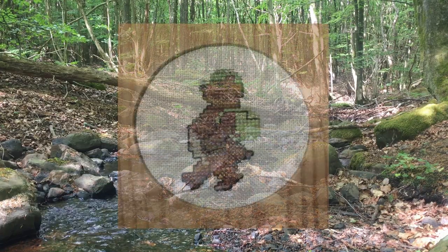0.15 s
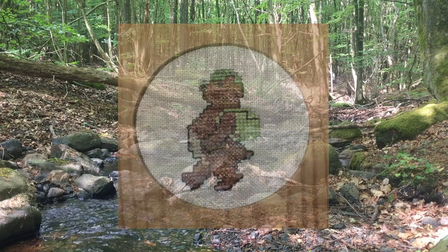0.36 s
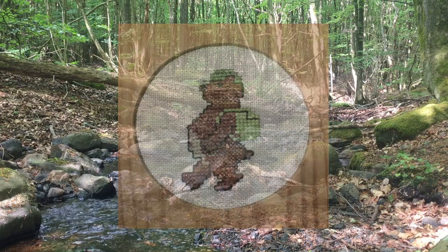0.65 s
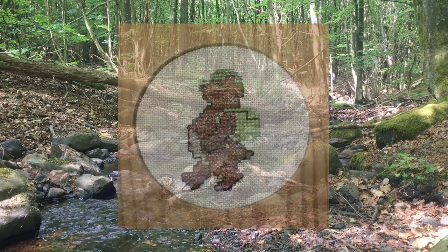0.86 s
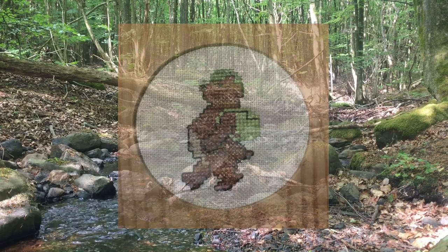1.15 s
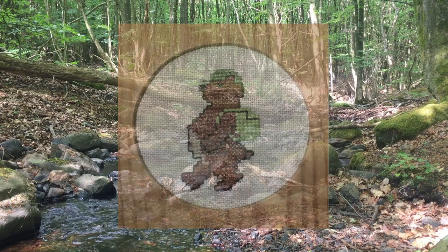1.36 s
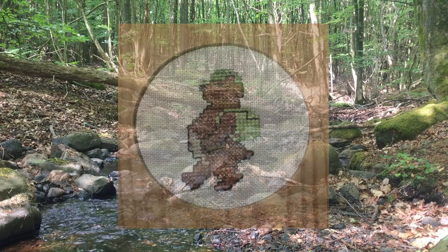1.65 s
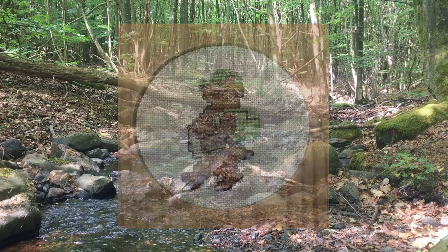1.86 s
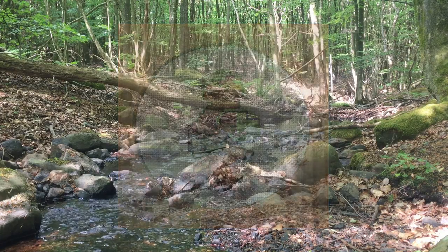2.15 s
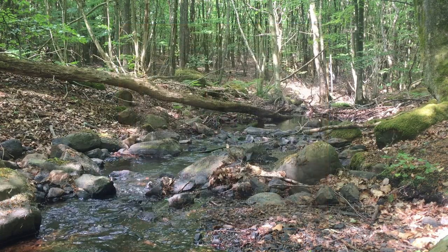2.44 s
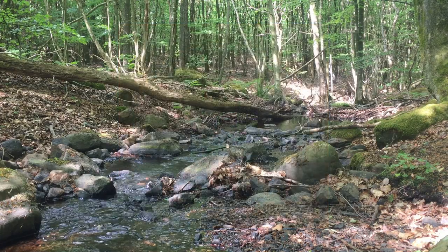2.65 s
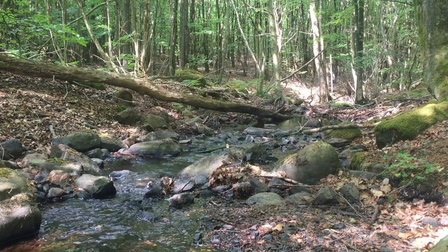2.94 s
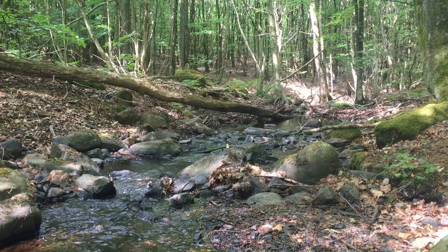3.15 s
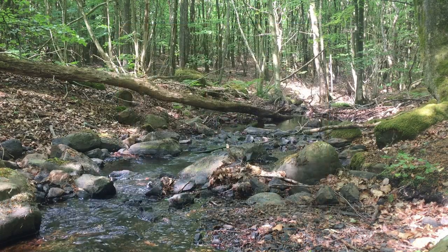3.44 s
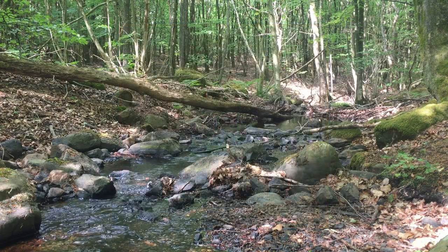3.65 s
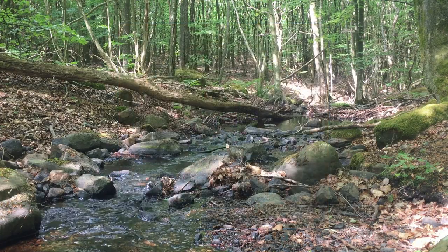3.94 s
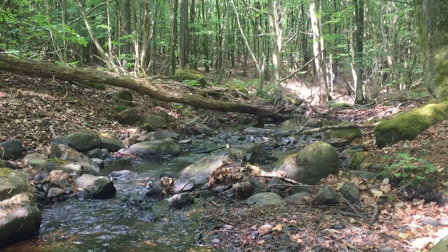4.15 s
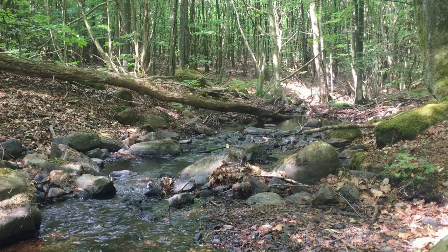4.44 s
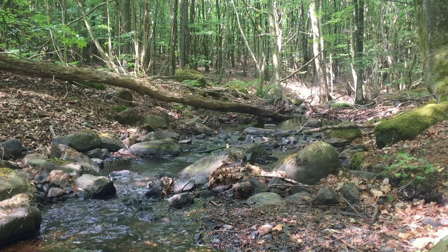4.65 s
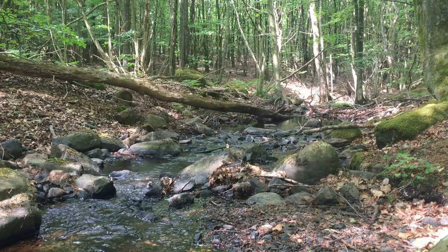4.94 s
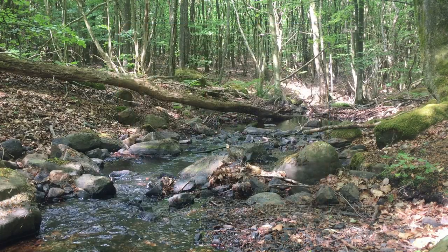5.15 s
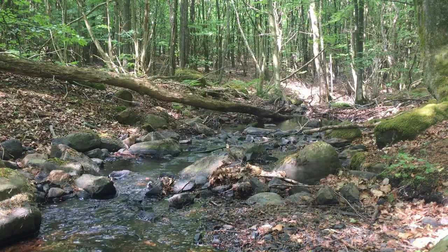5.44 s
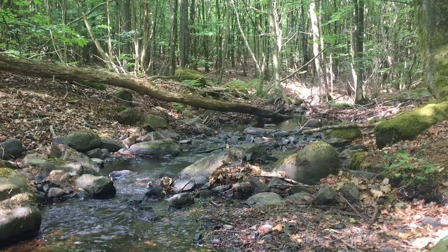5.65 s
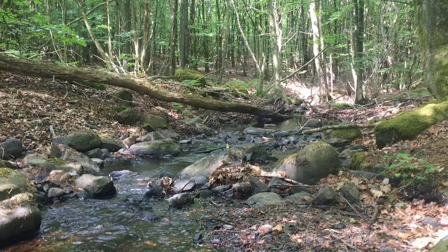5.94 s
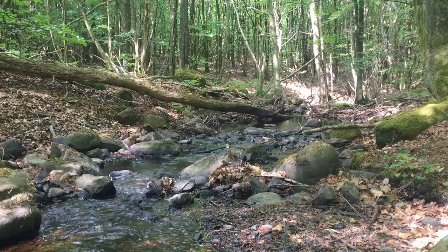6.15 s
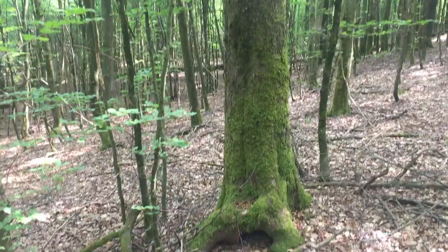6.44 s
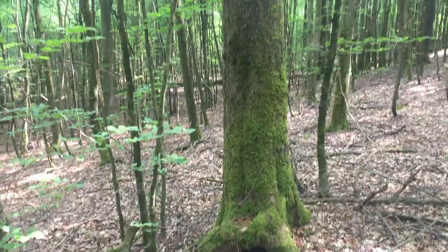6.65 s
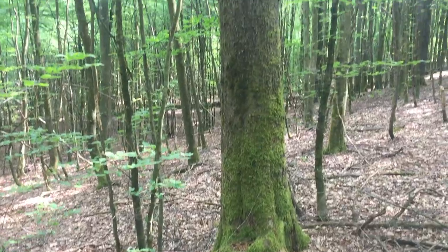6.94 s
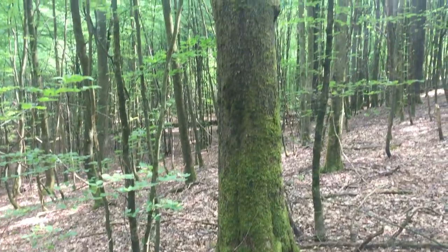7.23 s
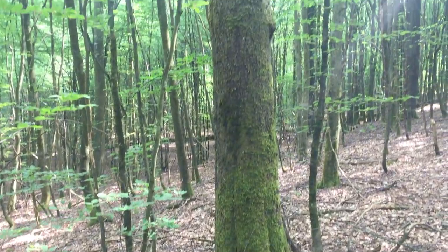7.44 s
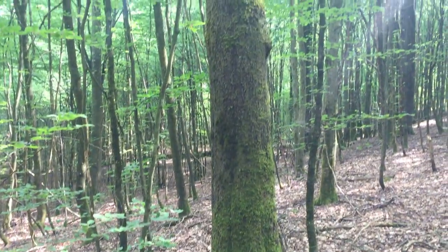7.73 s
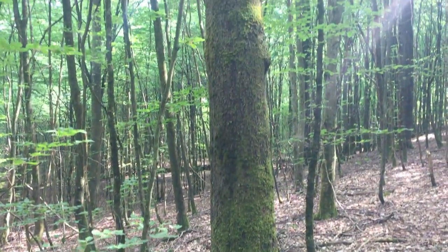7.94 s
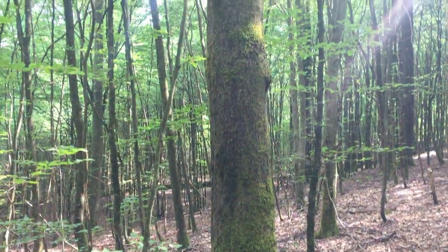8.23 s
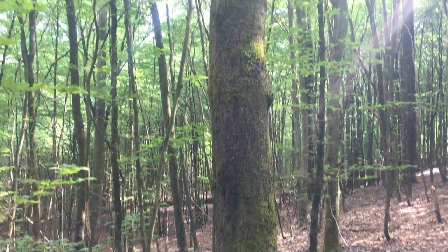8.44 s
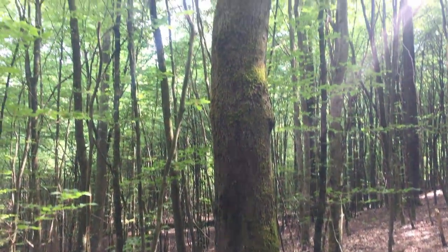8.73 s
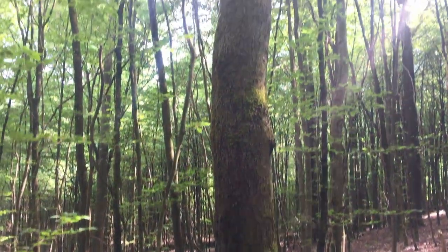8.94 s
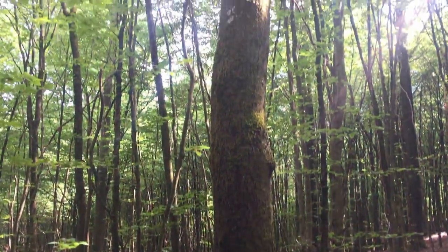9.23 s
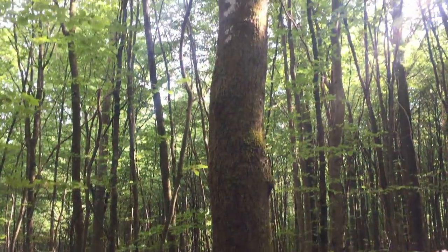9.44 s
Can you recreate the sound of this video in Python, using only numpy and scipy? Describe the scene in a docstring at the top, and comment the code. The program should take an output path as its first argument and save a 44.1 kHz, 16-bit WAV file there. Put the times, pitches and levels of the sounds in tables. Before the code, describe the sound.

A small stream trickles steadily over stones, close to the microphone, with bubbly plops, quick gurgles and crisp spits over a soft watery hiss, plus faint low wind puffs early on. After about six seconds the water ends at once. A very quiet wood follows: soft dull knocks like handling of the device, a faint fast high bird trill, weak far whistles and a few tiny ticks.

```python
"""Woodland stream and quiet wood

A shallow stream trickles over rocks: clumps of bubbles, single ringing bubbles and spits, each a short
decaying sine of rising pitch, over a wash of noise coloured by the bed. A breeze adds low-pitched noise.
The water stops at once; a short tail of filtered noise fades into the still air of a wood, a noise with
more bass than treble. Gritty impulses through resonators make soft knocks, beside sharp ticks and dry
rustles; swept sines with echoes make a small bird's trill and far whistling birds.
"""
import sys
import numpy as np
from scipy import signal
from scipy.fft import rfft, irfft, next_fast_len
from scipy.io import wavfile
from scipy.ndimage import uniform_filter1d

SR = 44100
rng = np.random.default_rng(int(sys.argv[2]) if len(sys.argv) > 2 else 0)


def pcm_store(signal):
    """Save signal as 16-bit PCM."""
    levels = np.round(np.clip(np.atleast_2d(signal), -1, 1) * 32767)
    wavfile.write(sys.argv[1], SR, levels.astype(np.int16).T)


N = 422478
TIME = np.arange(N) / SR
STOP_S = 6.267  # the water stops


def gain_of(db):
    """Decibel law: a level in dB becomes an amplitude factor."""
    return 10 ** (np.asarray(db) / 20)


def evened(x):
    """Power normalisation: scales to rms 1."""
    return x / np.sqrt(np.mean(x ** 2) + 1e-20)


def peaked(x):
    """Amplitude normalisation: scales to peak 1."""
    return x / (abs(x).max() + 1e-20)


def read(points, hz):
    """Interpolation of a spectrum table on a log-frequency axis."""
    f, value = np.transpose(points)
    return np.interp(np.log(hz + 1), np.log(f + 1), value)


def curve(rows):
    """Linear interpolation of a control curve at every sample."""
    return np.interp(TIME, *np.transpose(rows))


def add(mix, s, sound):
    """Superposition: lays a sound into the mix, in place, at time s."""
    part = mix[max(round(s * SR), 0):][:len(sound)]
    part += sound[:len(part)]


def colour(x, db_at):
    """Linear filtering: a rule gives the gain in dB at each frequency."""
    size = next_fast_len(len(x) + 2048)
    gains = gain_of(db_at(np.fft.rfftfreq(size, 1 / SR)))
    return irfft(rfft(x, size) * gains, size)[:len(x)]


def noise(points, size=N):
    """Filtered random noise of rms 1 with the given spectrum."""
    return evened(colour(rng.standard_normal(size), lambda hz: read(points, hz)))


def drift(length_s):
    """Low-passed noise: slow random change of rms 1, the slower the longer length_s."""
    return evened(colour(rng.standard_normal(N), lambda hz: -20 * np.log10(1 + (hz * length_s * 2) ** 2)))


def echo(x, t60s, delay):
    """Reverberation: sparse reflections of total energy 1, each band decaying at its own rate."""
    taps = rng.standard_normal(SR) * (rng.random(SR) < .05)
    hz, t, bands = signal.stft(taps, SR, nperseg=256)
    decay = gain_of(-60 * t / read(t60s, hz)[:, None])
    tail = signal.istft(bands * decay, SR, nperseg=256)[1]
    tail = np.concatenate([np.zeros(round(delay * SR)), tail])
    return signal.oaconvolve(x, tail / np.linalg.norm(tail))[:N]


def bubble(hz, cycles, rise, onset=0.51):
    """Bubble resonance: trapped air swells over `onset` cycles, rings, and climbs in pitch near the surface."""
    age = np.arange(int(2.6 * cycles * SR / hz) + 2) * hz / (cycles * SR)  # 1 = `cycles` periods
    turns = cycles * age * (1 + rise * (age - 1) / 2)
    swell = (1 - np.exp(-turns / onset)) ** 1.44
    return np.sin(2 * np.pi * turns) * swell * np.exp(-age ** 2)


def supply(count):
    """Jittered regular process: a steady supply of splashes (t/s, force 0-1) until the water stops."""
    jitter, force = rng.random(size=(count, 2)).T
    slots = (np.arange(count) + 9 * jitter) % count
    return np.column_stack([STOP_S * slots / count, force])


def splashes(events, low_hz, high_hz, scatter, cycles, swell, rise, spread_s, splash_db, bubble_db, size):
    """Clustered bubble resonances: each splash sheds bubbles of related pitch within milliseconds."""
    out = np.zeros(N)
    for s, force in events:
        centre_hz = low_hz * (high_hz / low_hz) ** rng.random()
        detune, loud, ring = np.clip(rng.standard_normal((3, size)), -1.7, 1.7)
        delays = spread_s * rng.gamma(2, 1, size) * np.exp(.5 * rng.standard_normal())
        pitches = np.minimum(centre_hz * np.exp(scatter * detune), SR / 2)
        # the cube leaves most splashes weak
        levels = gain_of(splash_db * force ** 3 + bubble_db * loud) * np.sqrt(pitches)
        lengths = cycles * np.exp(0.52 * ring)
        for delay, hz, level, length in zip(delays, pitches, levels, lengths):
            add(out, s + delay, level * bubble(hz, length, rise, onset=swell * length))
    return out


def flattened(x):
    """Spectral whitening: removes the broad tilt so that a spectrum table can set it."""
    size = next_fast_len(N)
    spectrum = rfft(x, size)
    power = uniform_filter1d(abs(spectrum) ** 2, size=2400)
    return irfft(spectrum / np.sqrt(abs(power) + power.max() / 1e4), size)[:N]


def rocky_bed(water, bed):
    """Cavity resonance: a bed colours the water, and its hollows wander in pitch as the water sloshes."""
    # hollows between the rocks favour or weaken some pitches: f/Hz, width/Hz, gain/dB
    hollow_modes = [(325, 33, 6), (723, 18, -2.5), (1020, 53, 8), (1152, 74, -3.5), (1230, 66, 6),
                    (1725, 140, 5.5), (2100, 150, -1), (6630, 350, 1)]
    slosh_shift, slosh_s = 0.063, 0.11  # share of the pitch, dwell in s

    def tuned(hz):
        return read(bed, hz) + sum(db * np.exp(-((hz - f) / width) ** 2) for f, width, db in hollow_modes)

    slosh = np.tanh(drift(slosh_s))
    out = np.zeros(N)
    for step in (-1, 0, 1):  # crossfade between three tunings
        share = np.maximum(1 - abs(slosh - step), 0)
        out += share * evened(colour(water, lambda hz: tuned(hz * (1 + step * slosh_shift))))
    return evened(out)


def stream():
    """Superposed bubble resonances: babble, fizz and droplets, with a noise wash, filtered by the bed."""
    # water at the shallow edge, and at the fuller run between the rocks: f/Hz, relative level/dB per Hz
    shallow_bed = [(120, -57), (200, -16), (258, -32.5), (455, -8.5), (621, -8), (693, 5.5), (848, -13.5),
                   (1270, -8.5), (1610, -12), (2450, -5.5), (3460, -13), (5470, -13), (7600, -19.5),
                   (11600, -16), (15800, -24.5)]
    full_bed = [(120, -55), (200, -32), (481, 1.5), (621, -3), (999, 4), (1160, -3), (1270, 3.5),
                (1580, -3.5), (2450, -7), (3460, -12.5), (5890, -11), (7740, -20), (11200, -16.5),
                (15800, -19.5)]
    # how much of the fuller run is heard: t/s, share 0-1
    full_share = [(0, 0.25), (2.2, 0.12), (2.9, 0.59), (6.3, 0.7)]
    # strength of the flow: t/s, level/dB
    flow_level = [(0, -44.5), (0.55, -46), (0.85, -45), (1.35, -46.5), (1.95, -43.5), (2.5, -45.5),
                  (2.9, -43.5), (3.5, -45), (3.95, -42.5), (4.35, -44.5), (4.85, -44), (5.9, -43),
                  (6.25, -43.5)]
    babble = splashes(supply(count=950), low_hz=330.3, high_hz=3485, scatter=0.3108, cycles=4.85,
                      swell=0.35, rise=0.071, spread_s=.006, splash_db=5.5, bubble_db=1.5, size=4)
    fizz = splashes(supply(count=1400), low_hz=4260, high_hz=12000, scatter=0.383, cycles=3.2,
                    swell=0.49, rise=0.011, spread_s=.0017, splash_db=14, bubble_db=4.5, size=8)
    droplets = splashes(supply(count=1500), low_hz=2612, high_hz=13920, scatter=0.1515, cycles=8.8,
                        swell=0.5, rise=0.025, spread_s=.003, splash_db=7, bubble_db=4.0, size=2)
    spray = evened(fizz) * gain_of(5.5) + evened(droplets) * gain_of(-0.5)
    spurts = gain_of(1.5 * drift(0.019))  # uneven spurts: depth in dB, length in s
    wash = evened(rng.standard_normal(N)) * gain_of(-4.0)
    water = evened(flattened(evened(babble) + spray * spurts)) + wash * spurts
    share = np.clip(curve(full_share), 0, 1)
    mixed = (1 - share) * rocky_bed(water, shallow_bed) + share * rocky_bed(water, full_bed)
    return gain_of(curve(flow_level)) * mixed


def gurgle(length, hz, scatter, cycles, fade_db, size):
    """Air-pocket break-up: a quick run of overlapping bubbles, with the energy of rms 1 over `length` s."""
    out = np.zeros(SR // 4)
    when = (np.arange(size) + rng.random(size)) / size
    pitches = hz * np.exp(scatter * rng.permutation(np.linspace(-1, 1, size)))
    loud, ring = rng.uniform(-1.9, 1, (2, size))
    for u, pitch, db, turns in zip(when, pitches, 4 * loud, cycles * np.exp(0.46 * ring)):
        level = gain_of(db + fade_db * u)
        add(out, (u - when[0]) * length * .85, level * bubble(pitch, turns, .05, onset=0.36))
    return out * np.sqrt(length * SR / np.sum(out ** 2))


def snap(hz, cycles, crack, crack_s):
    """Impulsive excitation: a very short ring with a crack of noise, peak 1."""
    t = np.arange(1500) / SR
    envelope = t / crack_s * np.exp(1 - t / crack_s)  # peaks at crack_s
    out = crack * noise([(700, 1.5), (2500, 2.5), (15000, 6.5)], size=len(t)) * envelope
    add(out, 0, bubble(hz, cycles, 0.013, onset=2.7))
    return peaked(out)


def near_drops():
    """Bubble resonances close by: single ones with a plash of noise, runs, and spits with spray."""
    # single ringing bubbles: t/s, peak level/dB, f/Hz, ring/cycles (at least 1 is used)
    single_rows = [(0.322, -41, 1020, 5.6), (0.447, -34, 1060, 6), (0.788, -28, 1210, 2.3),
                   (0.845, -33, 770, 3.5), (0.863, -29.5, 704, 8), (1.018, -35, 710, 10),
                   (1.157, -32, 1370, 3.5), (1.962, -26, 2000, 1.1), (2.147, -26, 2850, 7.2),
                   (2.574, -37, 1930, 10), (2.868, -34, 950, 5.2), (2.876, -31.5, 2170, 15),
                   (2.906, -37, 470, 5.6), (2.939, -25, 1340, 7), (2.982, -35, 1370, 7.8),
                   (3.228, -24, 2620, 4.2), (3.636, -35, 567, 8.4), (3.755, -25, 737, 7.6),
                   (3.891, -36, 570, 11), (3.917, -29.5, 462, 3.4), (3.973, -34, 720, 8.8),
                   (5.092, -30, 1230, 3.6), (5.117, -23, 1014, 9.3), (5.319, -30, 800, 2.4),
                   (5.341, -33, 1370, 9.5), (5.359, -31, 552, 3.8), (5.41, -26.5, 5950, 17),
                   (5.413, -34.5, 1840, 12), (5.519, -31.5, 1190, 7.7), (5.62, -29.5, 1270, 9.3),
                   (5.662, -32.5, 930, 4.9), (5.835, -32, 1030, 3.9), (5.954, -31, 780, 5.5)]
    # runs of bubbles: t/s, length/s, level/dB, middle f/Hz
    gurgle_rows = [(0.32, 0.032, -44.5, 1430), (0.564, 0.029, -46, 1290), (0.749, 0.011, -41, 3150),
                   (0.757, 0.041, -46, 970), (0.972, 0.038, -53, 2240), (1.155, 0.023, -42.5, 1390),
                   (1.536, 0.013, -42.5, 3950), (1.583, 0.038, -41.5, 1160), (1.962, 0.03, -47, 1830),
                   (2.148, 0.023, -46, 3250), (2.685, 0.04, -45, 1330), (2.864, 0.022, -41, 1405),
                   (2.988, 0.041, -46, 1540), (3.166, .025, -44.5, 1410), (3.252, 0.058, -46.5, 3220),
                   (3.357, 0.045, -45.5, 1160), (3.587, 0.03, -42.5, 1000), (3.636, 0.026, -44, 910),
                   (3.695, 0.017, -46, 886), (3.89, 0.033, -38.5, 796), (4.149, 0.019, -42, 1270),
                   (4.618, 0.017, -44, 1070), (4.935, 0.025, -44, 932), (5.13, 0.027, -48, 1500),
                   (5.189, 0.013, -39.5, 2070), (5.318, 0.031, -37.5, 1620), (5.471, 0.018, -44.5, 1100),
                   (5.619, 0.02, -41, 1510), (5.723, 0.028, -47.5, 3330), (5.781, 0.015, -39, 1180),
                   (5.901, 0.026, -41.5, 950), (6.181, 0.022, -43.5, 1096)]
    # the sharpest bursting drops: t/s, peak level/dB, f/Hz
    spit_rows = [(0.0622, -25.5, 7850), (0.254, -23.5, 7560), (0.379, -32, 8650), (0.519, -27.5, 11500),
                 (0.5953, -24, 4800), (0.779, -26.5, 6800), (1.1315, -30, 8500), (1.4625, -26, 6600),
                 (1.5359, -23.5, 3700), (1.6005, -30.5, 7740), (1.8225, -28, 7100), (1.8782, -24, 5430),
                 (1.963, -21.5, 5660), (2.025, -19, 6000), (2.068, -26, 7050), (2.136, -27, 10600),
                 (2.3692, -28, 6400), (2.4475, -29, 5600), (2.5742, -25.5, 2300), (2.8476, -22.5, 6740),
                 (2.9647, -29.5, 3850), (3.0794, -27.5, 3600), (3.115, -27.5, 5150), (3.163, -21, 7200),
                 (3.263, -22, 3130), (3.2865, -23, 8800), (3.6353, -28, 5240), (3.924, -27, 3160),
                 (3.9715, -28, 8050), (4.273, -28.5, 8600), (4.469, -22.5, 5850), (4.5529, -29, 5900),
                 (4.729, -31, 9600), (4.8313, -25.5, 6200), (4.8806, -24, 10600), (4.917, -27.5, 7240),
                 (5.003, -34, 9000), (5.4114, -28, 5770), (5.729, -24.5, 2620), (5.8987, -26, 5500),
                 (6.0115, -29, 12900), (6.257, -27, 7300)]
    plash_colour = [(250, -28), (600, 6), (2200, 9), (5000, -49), (15000, -49)]  # f/Hz, level/dB per Hz
    out, t = np.zeros(N), np.arange(2500) / SR
    plash_envelope = (1 - np.exp(-t / 0.00084)) * np.exp(-t / 0.062)
    for s, db, hz, cycles in single_rows:
        add(out, s, gain_of(db - 22.5) * noise(plash_colour, size=len(t)) * plash_envelope)
        add(out, s + 0.001005, gain_of(db) * peaked(bubble(hz, max(cycles, 1), 0.031)))
    for s, length, db, hz in gurgle_rows:
        run = gurgle(length, hz, scatter=0.59, cycles=6.0, fade_db=-9.0, size=11)
        add(out, s, gain_of(db) * run)
    for s, db, hz in spit_rows:
        add(out, s + .0007, gain_of(db) * snap(hz, cycles=4.05, crack=0.14, crack_s=0.00063))
        spray = gurgle(0.017, hz, scatter=0.53, cycles=3.8, fade_db=-38, size=14)
        add(out, s + .002, gain_of(db - 25.5) * spray)
    return out


def fading_tail():
    """Decaying filtered noise: a short tail of narrow noise bands and soft hiss fades from 6.267 s."""
    # narrow noise bands: f/Hz, width/Hz, starting level/dB
    band_rows = [(836, 79, -58), (1066, 130, -55), (1280, 63, -62), (2220, 150, -70), (2640, 130, -62)]
    out, t = np.zeros(N), np.arange(SR // 2) / SR
    for hz, width, db in band_rows:
        band = colour(rng.standard_normal(len(t)), lambda f: -20 * np.log10(1 + ((f - hz) / width) ** 2))
        add(out, STOP_S, gain_of(db - 60 * t / 0.42) * evened(band))
    hiss = noise([(150, 13), (500, -1), (3000, -4), (6000, -4.0), (9000, -3), (15000, -15)], size=len(t))
    add(out, STOP_S, gain_of(-55.0 - 60 * t / 0.44) * hiss)
    return out


def knocks():
    """Stick-slip and modal resonance: gritty contacts catch twice and ring a case; some clacks and bumps."""
    # soft knocks: t/s, relative level/dB, t60/s (at least 0.03 is used), highest f/Hz, main f/Hz
    knock_rows = [(6.302, -47.5, 0.054, 2000, 830), (6.379, -61, 0.046, 2400, 1180),
                  (6.589, -47.5, 0.074, 3200, 767), (6.772, -66.5, 0.087, 3400, 2240),
                  (6.899, -51.5, 0.08, 1790, 754), (7.14, -62, 0.051, 2600, 775),
                  (7.182, -57.5, 0.059, 2400, 754), (7.463, -54.5, 0.056, 2300, 1330),
                  (7.736, -51.5, 0.13, 4040, 900), (7.896, -54.5, 0.078, 2490, 655),
                  (8.054, -67, 0.1, 1400, 1130), (8.353, -63, 0.042, 1800, 1440),
                  (8.661, -55.5, 0.088, 2620, 905), (8.85, -54.5, 0.076, 1430, 1100),
                  (8.97, -58.5, 0.075, 1900, 850), (9.282, -58, 0.14, 1700, 765),
                  (9.437, -64.5, 0.18, 900, 740)]
    # modes of the case: f/Hz, width/Hz, relative level/dB
    case_modes = [(730, 64, 1.5), (940, 73, -3), (1260, 190, -4), (1595, 110, -3.5), (1970, 280, -8),
                  (2480, 340, -4.5), (3980, 140, -12)]
    # the hard clack at the heart of two knocks: t/s, peak level/dB, f/Hz
    clack_rows = [(6.9022, -42, 800), (8.8587, -41, 980)]
    # low bumps: t/s, relative level/dB, f/Hz, t60/s
    bump_rows = [(6.267, -45.5, 133, 0.099), (6.269, -51, 220, 0.1), (6.335, -49, 106, 0.11),
                 (6.592, -71, 117, 0.11), (6.908, -56, 139, 0.078), (8.355, -58, 81.4, .2),
                 (9.306, -49, 87, 0.1)]
    rebound_s, rebound_db = 0.017, -15.5  # the contact slips and catches again
    grit_per_s, grit_db = 1300, 3  # tiny catches, and the spread of their strength
    out, t = np.zeros(N), np.arange(SR // 3) / SR
    case = np.zeros(len(t))
    for k, (hz, width, db) in enumerate(case_modes):
        mode = width * np.exp(-np.pi * width * t) * np.sin(2 * np.pi * hz * t)
        case += gain_of(db) * mode * (-1) ** k
    for s, db, t60, top_hz, main_hz in knock_rows:
        push = peaked((1 - np.exp(-t / .003)) * gain_of(-60 * t / max(t60, .03)))
        add(push, rebound_s, gain_of(rebound_db) * push)
        sizes = rng.choice([-1, 1], len(t)) * gain_of(grit_db * rng.standard_normal(len(t)))
        grit = push * sizes * (rng.random(len(t)) < grit_per_s / SR)
        main_mode = 90 * np.exp(-t / 0.0052) * np.cos(2 * np.pi * main_hz * t)
        ring = signal.fftconvolve(grit, case + main_mode)[:len(t)]
        body = colour(evened(ring) + gain_of(-3.5) * evened(grit),
                      lambda hz: -10 * np.log10(1 + (hz / top_hz) ** 14))
        contact = evened(body + gain_of(-18.5) * evened(grit))
        add(out, s, gain_of(db) * contact * np.sqrt(np.mean(push ** 2)))
    for s, db, hz in clack_rows:
        add(out, s, gain_of(db) * peaked(bubble(hz, cycles=2.2, rise=0.055, onset=1.8)))
    for s, db, hz, t60 in bump_rows:
        envelope = gain_of(db - 60 * t / t60) * (1 - np.exp(-t / .005))
        add(out, s, envelope * np.sin(2 * np.pi * hz * t))
    return out


def ticks():
    """Impulsive excitation with reverberation: a few sharp ticks and their short echo."""
    # sharp little ticks: t/s, peak level/dB before the final colouring, f/Hz
    tick_rows = [(8.902, -50, 8200), (9.1282, -54, 8930), (9.347, -36.5, 9000)]
    out = np.zeros(N)
    for s, db, hz in tick_rows:
        add(out, s + 0.0014, gain_of(db) * snap(hz, cycles=6.5, crack=0.55, crack_s=0.00069))
    out += gain_of(-8) * echo(out, [(3000, 0.13), (15000, 0.14)], delay=0.0015)
    return colour(out, lambda hz: read([(3000, -20), (6000, 2.5), (10000, -5.5), (15000, -4)], hz))


def trill(count=23):
    """Frequency modulation: quick upward flicks start ever lower and slow a little, blurred by the trunks."""
    start_s, gap_s, slowing_s = 6.4385, .0422, 0.00026  # first note, first gap, added to each gap
    level_db, fade_in_db, swell_s = -64, -9, 0.2  # the trill swells to full strength
    first_hz, last_hz, top_hz, note_s = 5400, 4220, 6840, 0.02  # first and last starting pitch, flick's end
    out, u = np.zeros(N), np.linspace(0, 1, int(note_s * SR))
    for k, start_hz in enumerate(np.linspace(first_hz, last_hz, count)):
        age = k * gap_s + k * (k - 1) / 2 * slowing_s
        db = level_db + fade_in_db * np.exp(-age / swell_s) + rng.standard_normal()
        heights = [0.04, 0.23, 0.45, 1, 0.55, 0.15] * gain_of(1.7 * rng.standard_normal(size=6))
        swell = np.interp(u, [0, .2, .45, .72, .88, 1], heights)
        hz = (start_hz + (top_hz - start_hz) * u ** 2.7) * (1 + 0.0084 * rng.standard_normal())
        add(out, start_s + age, gain_of(db) * swell * np.sin(2 * np.pi * np.cumsum(hz) / SR))
    return out + gain_of(-2.5) * echo(out, [(3000, 0.41), (8000, 0.38)], delay=0.003)


def far_bird():
    """Random frequency modulation: husky, wavering notes are blurred by their echo from the trunks."""
    # far whistles: t/s, length/s, start f/Hz, end f/Hz, relative level/dB
    whistle_rows = [(8.16, 0.39, 1930, 1947, -81), (8.391, 0.07, 1980, 1900, -76),
                    (8.49, 0.087, 4500, 4380, -85), (8.575, 0.097, 2740, 2440, -76),
                    (8.665, 0.096, 2670, 2800, -76), (8.69, 0.08, 2117, 2280, -66.5),
                    (8.728, 0.058, 2200, 1780, -67), (8.815, .07, 2110, 2156, -71),
                    (9.09, 0.12, 4020, 4730, -83), (9.19, 0.12, 4480, 4930, -90),
                    (9.28, .09, 4420, 3900, -83)]
    waver_depth, waver_hz = .022, 350  # share of the pitch, speed
    out = np.zeros(N)
    for s, length, start_hz, end_hz, db in whistle_rows:
        hz = np.linspace(start_hz, end_hz, int(length * SR))
        waver = colour(rng.standard_normal(SR), lambda f: -20 * np.log10(1 + (f / waver_hz) ** 2))
        hz *= 1 + waver_depth * evened(waver)[:len(hz)]
        note = np.hanning(len(hz)) * np.sin(2 * np.pi * np.cumsum(hz) / SR)
        add(out, s, gain_of(db + 9.0) * note)
    near = echo(out, [(2000, 0.14), (5000, 0.32)], delay=0.00303)
    far = echo(out, [(1000, 1.9), (5000, .9)], delay=0.02)
    return gain_of(-7) * out + gain_of(-1.0) * near + gain_of(-7.5) * far


def rustles():
    """Amplitude-modulated noise: faint dry brushes rise quickly and fade."""
    # faint dry rustles: t/s, level/dB, t60/s
    rustle_rows = [(7.73, -67.5, 1), (7.885, -65.5, 0.21), (8.475, -70.5, 0.72), (8.85, -84, 1.0),
                   (9.24, -76, 0.98), (9.38, -85, .6)]
    # their spectrum: f/Hz, relative level/dB per Hz
    dry_colour = [(2000, 1), (4300, 2), (6000, -6), (9000, -3), (15000, -14)]
    rise_s = 0.0087
    strength, t = np.zeros(N), np.arange(SR) / SR
    for s, db, t60 in rustle_rows:
        add(strength, s, np.minimum(t / rise_s, 1) * gain_of(db - 60 * t / t60))
    return noise(dry_colour) * strength


def breeze():
    """Amplitude-modulated noise: a low rumble of light wind dies down, swelling briefly with each puff."""
    # strength of the breeze: t/s, relative level/dB
    breeze_level = [(0, -71.5), (1.6, -72.5), (2.3, -69), (2.8, -74.5), (6.2, -84)]
    # puffs: t/s at the height, length/s, relative level/dB
    puff_rows = [(0.107, 0.13, -66), (0.277, 0.09, -57), (1.165, 0.07, -60), (1.483, .14, -64),
                 (1.63, 0.056, -56), (1.767, 0.074, -68)]
    # spectrum of the rumble: f/Hz, relative level/dB per Hz
    rumble_colour = [(18, -20), (30, -15), (44, 6.5), (70, 8.5), (90, 6), (125, -1), (220, -21), (350, -44)]
    strength = gain_of(curve(breeze_level))
    for s, length, db in puff_rows:
        add(strength, s - length / 2, gain_of(db) * np.hanning(int(length * SR)))
    return gain_of(0.5) * noise(rumble_colour) * strength


def still_air():
    """Stationary filtered noise: the still air of the wood."""
    # spectrum of the air: f/Hz, relative level/dB per Hz
    air_colour = [(15, -62), (25, -14), (64, 0), (170, -0.5), (255, 0.5), (473, -7), (881, -6.5),
                  (1680, -13), (2260, -12), (4950, -20), (5820, -20), (14600, -28), (15800, -35)]
    return gain_of(-70) * noise(air_colour)


def scene():
    """Superposition: the stream with rock reflections and breeze until it stops, and the quiet wood."""
    water = stream() + near_drops()
    water += gain_of(-15.0) * echo(water, [(300, 0.035), (3000, 0.078), (15000, 0.0058)], delay=.003)
    running = np.clip((STOP_S - TIME) / 0.0013, 0, 1)
    contacts = knocks() + ticks() + rustles()
    birds = trill() + far_bird()
    return ((water + breeze()) * running + fading_tail() + contacts + birds + still_air())[None]


def record(dry):
    """Band limitation: a linear-phase low-pass filter at 16050 Hz."""
    lowpass = signal.firwin(511, 16050, window=("kaiser", 9), fs=SR)
    return signal.oaconvolve(dry, lowpass[None], "same")


dry = scene()
out = record(dry)
pcm_store(out)
```